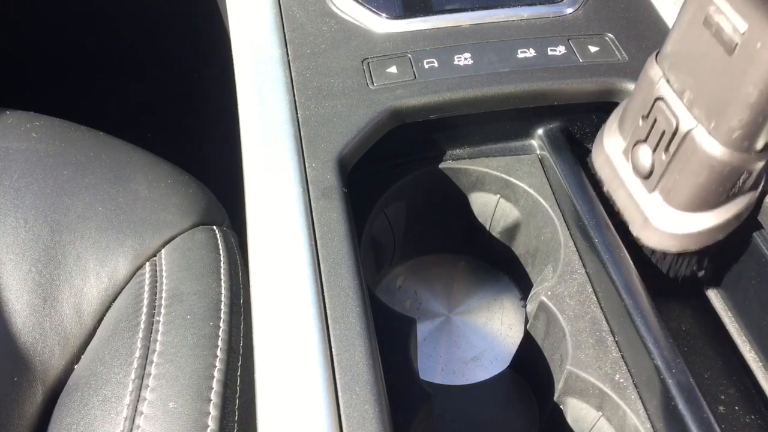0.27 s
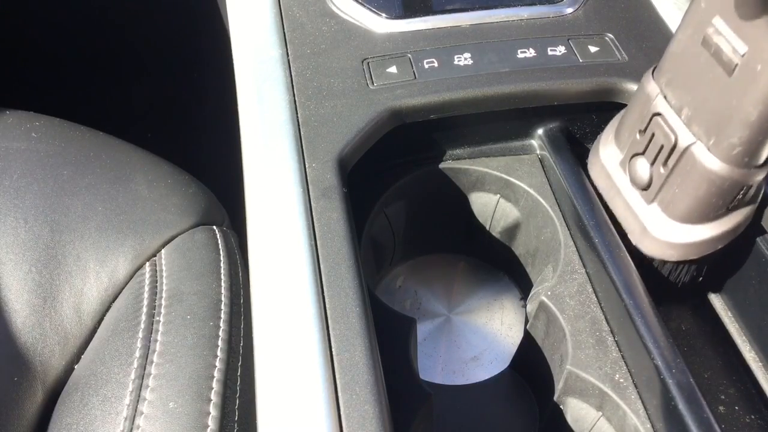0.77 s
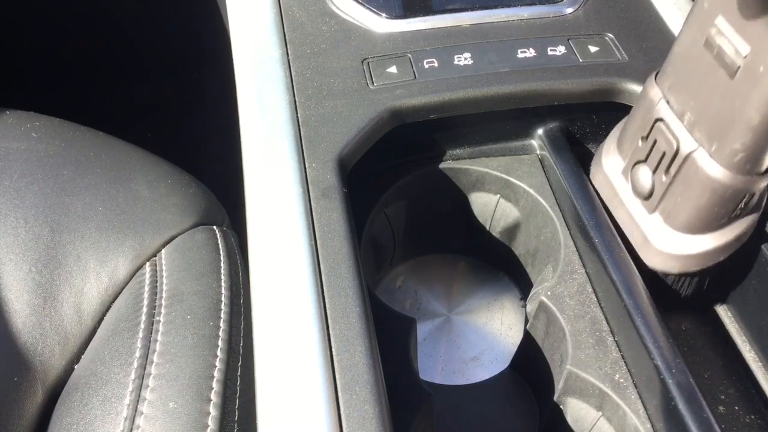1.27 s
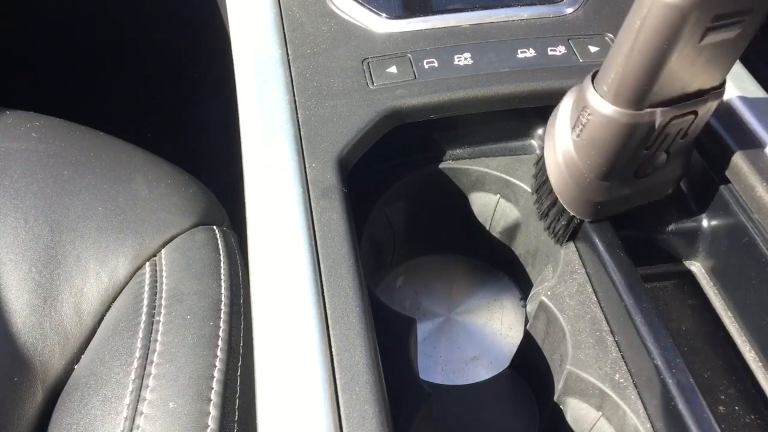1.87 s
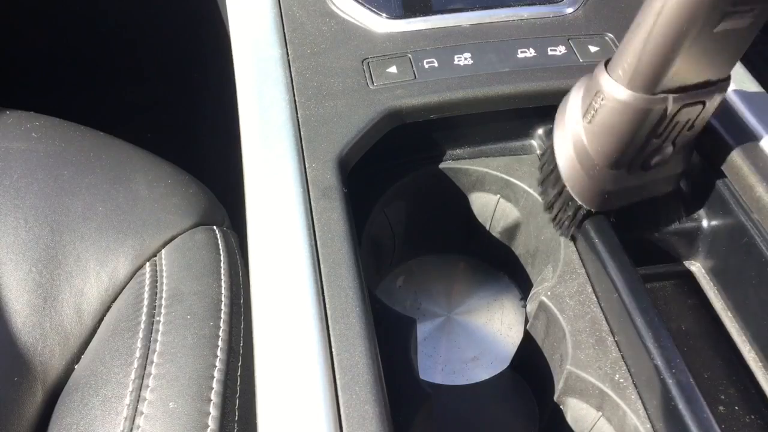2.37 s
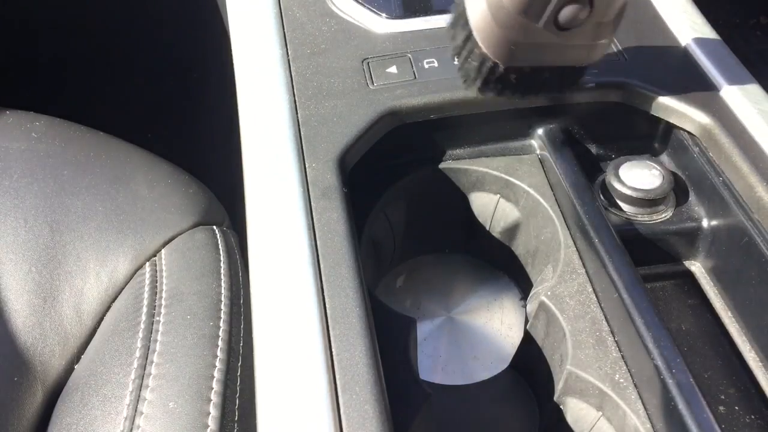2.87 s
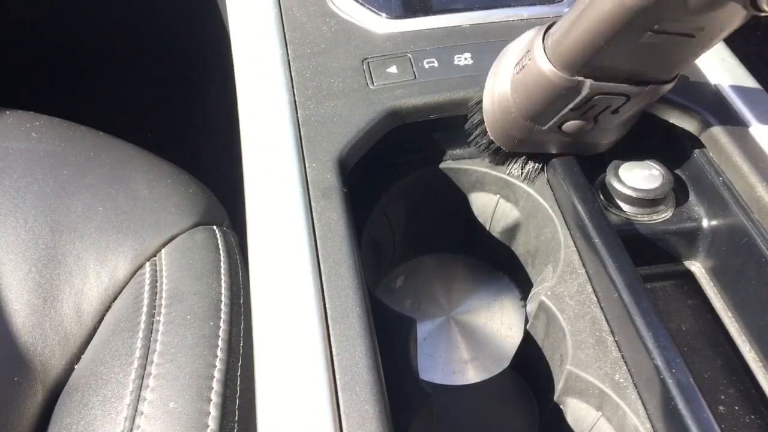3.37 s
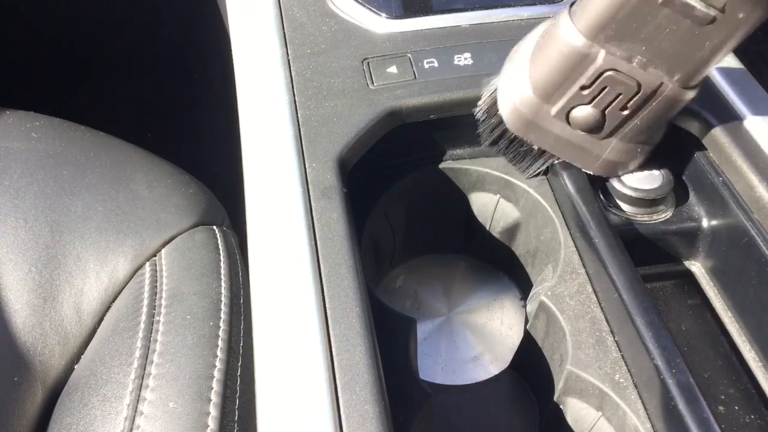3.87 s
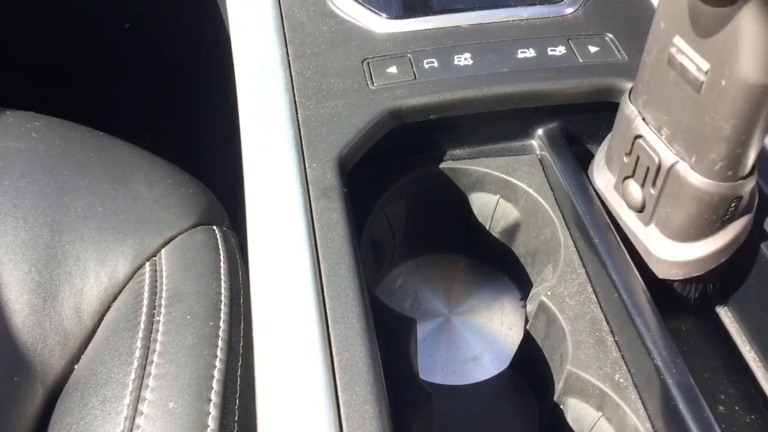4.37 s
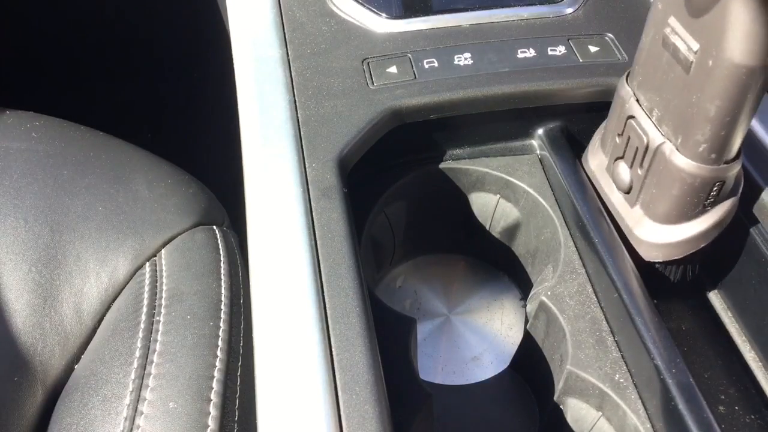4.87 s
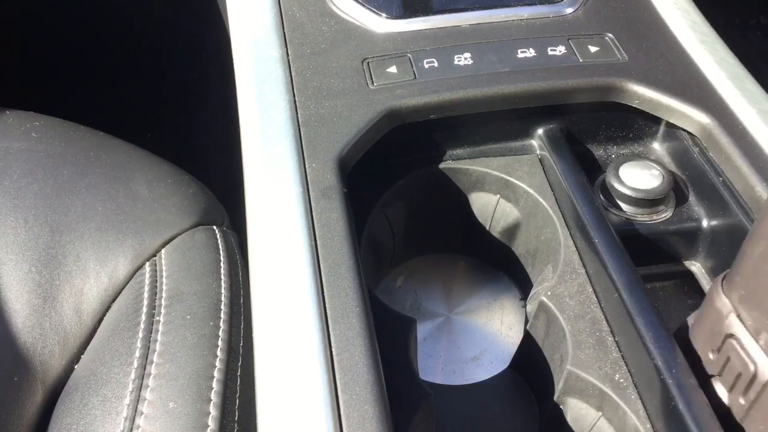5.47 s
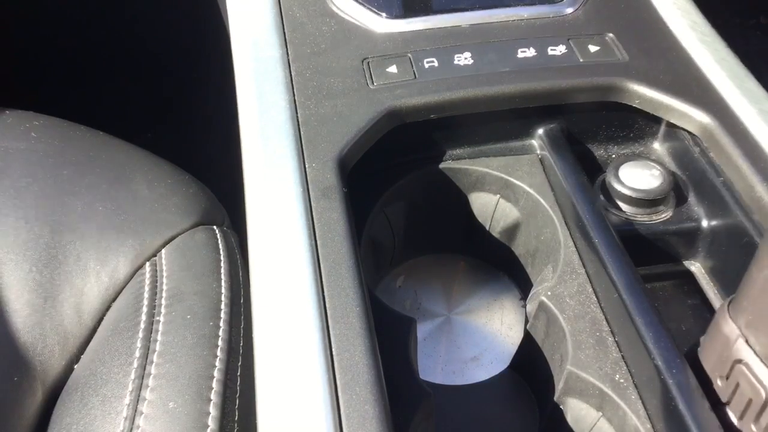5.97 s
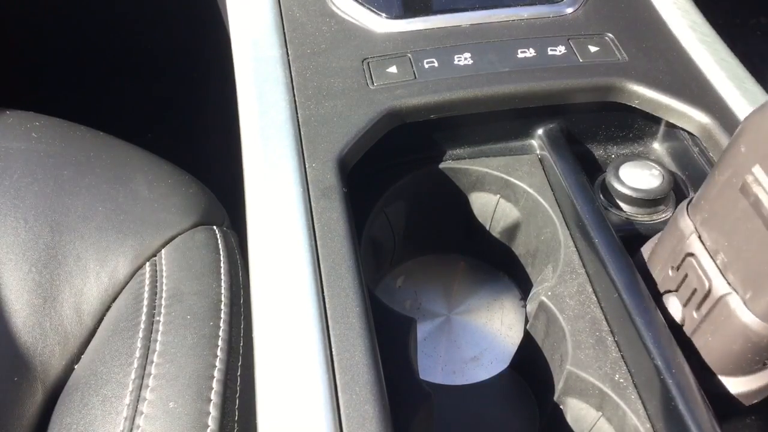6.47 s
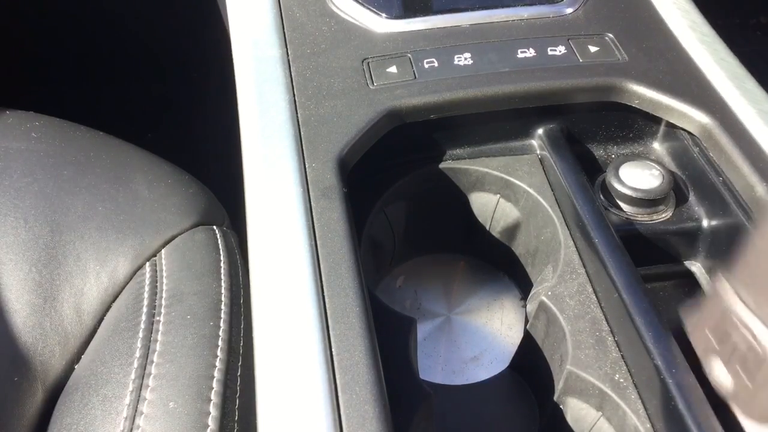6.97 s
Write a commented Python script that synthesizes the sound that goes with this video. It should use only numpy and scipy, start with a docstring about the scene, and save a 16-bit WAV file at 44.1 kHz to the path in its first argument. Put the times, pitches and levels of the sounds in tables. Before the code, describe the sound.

Close, bright vacuum hiss with a thin high motor whine, sparse soft bumps at first, then a flurry of dull thuds and hard plastic knocks.

```python
"""Handheld vacuum in a car

A cordless vacuum with a brush works over a plastic console inside a car, close to a mono microphone.
The impeller whines as sines on its shaft orders, above the roar and hiss of air made from shaped noise.
The brush rumbles over the trim; the nozzle bumps it, each bump a falling thump with a low heave under it.
Now and then the hard rim knocks and rings the plastic shell."""
import sys
import numpy as np
from scipy import signal
from scipy.fft import rfft, irfft, next_fast_len
from scipy.io import wavfile
from scipy.ndimage import uniform_filter1d, map_coordinates

SR = 44100
rng = np.random.default_rng(int(sys.argv[2]) if len(sys.argv) > 2 else 0)


def generate_wav(sig):
    """Save sig (samples, or channels by samples) to the path in sys.argv[1] as 16-bit PCM at SR."""
    pcm = np.round(np.clip(np.atleast_2d(sig).T, -1, 1) * 32767).astype(np.int16)
    wavfile.write(sys.argv[1], SR, pcm)


N = 318843  # samples, 7.23 s


def amp(db):
    """Amplitude factor for a level in dB."""
    return 10 ** (np.asarray(db) / 20)


def unit(x):
    """x scaled to rms 1."""
    return x / np.sqrt(np.mean(x ** 2) + 1e-20)


def curves(rows):
    """One value per sample for each column after the time."""
    seconds, *columns = np.transpose(rows)
    return [np.interp(np.arange(N) / SR, seconds, column) for column in columns]


def wobble(rate):
    """A smooth random curve with rate knots a second."""
    knots = rng.standard_normal(int(N * rate / SR) + 4)
    return map_coordinates(knots, [np.arange(N) * rate / SR])


def filtered(x, response):
    """x filtered by a response given as a function of frequency in Hz."""
    size = next_fast_len(N + SR // 2)
    spectrum = rfft(x, size) * response(np.fft.rfftfreq(size, 1 / SR))
    return irfft(spectrum, size)[..., :N]


def patches(shape, bins, frames):
    """Random values of rms 1 over frequency and time, smoothed across bins and frames."""
    field = uniform_filter1d(rng.standard_normal(shape), size=bins, axis=0)
    return unit(uniform_filter1d(field, size=frames, axis=1))


def rush(spectrum, patchy_db, flutter_db):
    """Turbulent noise of rms 1: patches of random gain and an unsteady flow."""
    z = signal.stft(rng.standard_normal(N), nperseg=512)[2]
    gain = amp(patchy_db * patches(z.shape, bins=5, frames=16))
    noise = signal.istft(z * gain, nperseg=512)[1][:N]
    corner_hz, db = np.transpose(spectrum)

    def colour(hz):
        return amp(np.interp(np.log(hz + 1), np.log(corner_hz), db, -120, -120))

    return unit(filtered(noise, colour) * amp(flutter_db * wobble(9)))


def ringing(x, peaks, floor_db):
    """x through fixed resonances whose powers add above a flat floor, rms 1."""
    def response(f):
        power = amp(2 * floor_db)
        for hz, width, db in peaks:
            power = power + amp(2 * db) / (1 + (2 * (f - hz) / width) ** 2)
        return np.sqrt(power)

    return unit(filtered(x, response))


# Shaft speed, sagging with the battery and rising when the nozzle is choked.
# Each row: time in seconds, speed in Hz.
SHAFT_SPEED = [(0, 1452), (.2, 1451.9), (.5, 1449.4), (1.8, 1447.8), (1.9, 1446.7), (2.9, 1445.4),
               (3.2, 1446.5), (3.42, 1450), (3.6, 1446.7), (3.85, 1447), (4, 1449.3), (4.15, 1448),
               (5.6, 1446.6), (5.83, 1448.6), (5.92, 1446.4), (6.3, 1446), (6.45, 1447.2), (6.6, 1445.6),
               (7.23, 1445)]
# Shaft tone at the microphone, steady but shadowed while the tool is turned away.
# Each row: time in seconds, level in dB.
SHAFT_LEVEL = [(0, -30.5), (1.76, -31), (1.88, -52), (2.2, -47), (2.42, -50), (2.52, -39), (2.78, -35.5),
               (3.06, -35), (3.21, -42), (3.38, -32.5), (3.54, -34), (3.62, -45), (3.8, -30.5), (3.9, -40),
               (4.0, -29.5), (4.9, -34), (5.4, -29.5), (6.3, -32.5), (6.87, -29), (7.23, -34.5)]
# Second shaft order. Each row: time in seconds, level in dB.
SECOND_LEVEL = [(0, -43), (1.6, -46), (1.8, -33.5), (1.9, -39.5), (2.35, -40), (2.9, -48.5), (3.2, -42),
                (3.55, -53), (4.25, -39), (4.55, -48), (5.0, -55), (5.25, -45), (5.8, -39.5), (7.23, -43)]
# Blade tone, fading in and out as the tool moves. Each row: time in seconds, level in dB.
BLADE_LEVEL = [(0, -33), (.17, -25), (.32, -40), (.5, -24), (.68, -46), (.82, -29), (.95, -38), (1.04, -34),
               (1.18, -25), (1.3, -42), (1.43, -29), (1.56, -34), (1.66, -44), (1.78, -32), (1.85, -39),
               (1.9, -24), (2.37, -36), (2.5, -29), (3.0, -25), (3.3, -27.5), (3.52, -24.5), (3.62, -39),
               (3.85, -36), (3.99, -29), (4.1, -36), (4.2, -32), (4.3, -36), (4.4, -29), (4.5, -41),
               (4.75, -40), (4.88, -33), (5.0, -40), (5.12, -31), (5.42, -28), (5.58, -37), (5.84, -29),
               (5.9, -37), (6.2, -38), (6.32, -26), (6.6, -29), (6.8, -48), (7.1, -29), (7.23, -31)]
BLADES = 7


def motor():
    """Shaft orders as sines; the casing hides or shows each as the hand turns it."""
    shaft_db, second_db, blade_db = (curves(rows)[0] for rows in (SHAFT_LEVEL, SECOND_LEVEL, BLADE_LEVEL))
    speed_hz = curves(SHAFT_SPEED)[0] + .25 * wobble(20)
    turn = 2 * np.pi * np.cumsum(speed_hz) / SR
    # each level trembles both fast and slowly
    shaft = amp(shaft_db + .78 * wobble(25) + 1.0 * wobble(8)) * np.sin(turn)
    second = amp(second_db + 2.4 * wobble(25) + 1.45 * wobble(8)) * np.sin(2 * turn)
    blade = amp(blade_db + 1.7 * wobble(30) + 1.3 * wobble(9)) * np.sin(BLADES * turn)
    # weak orders on either side of the blade tone come and go
    side = sum(amp(db + 3.3 * wobble(6.1)) * np.sin(order * turn) for order, db in ((5, -46), (8, -48)))
    return np.sqrt(2) * (shaft + second + blade + side)  # the levels are rms


# Air spectra by place: roar in the wand, hum in the casing, rush at the nozzle, hiss at the bristles,
# hiss at the exhaust and fizz at the vents. Each row: frequency in Hz, relative density in dB per Hz.
ROAR_SPECTRUM = [(150, -37), (300, -8), (500, -1.5), (1300, 0.5), (1600, 1), (2500, -40)]
HUM_SPECTRUM = [(800, -44), (1400, 1), (1700, -2.5), (3500, -2), (4300, -11.5), (6000, -38)]
NOZZLE_SPECTRUM = [(2800, -25), (3800, -6), (4300, -5), (4900, -1.5), (5400, -2), (5900, -5.5), (7500, -28)]
BRISTLE_SPECTRUM = [(4500, -48), (5600, -3), (6100, -1), (6800, 2), (7600, -2.5), (8400, -5.5),
                    (11000, -40)]
EXHAUST_SPECTRUM = [(6500, -47), (7800, -7.5), (8300, -2), (8700, -3), (9300, -1), (9800, -4.5),
                    (10500, -8.5), (11500, -42)]
VENT_SPECTRUM = [(9000, -14), (10300, -6.5), (11000, -5), (11600, -3.5), (12500, -1), (13500, -5),
                 (14500, -4.5), (16000, -4.5)]
# Resonances of the wand's air column, then of the casing.
# Each row: frequency in Hz, width in Hz, relative level in dB.
WAND_MODES = [(750, 89, -1.5), (1061, 96, -5.5), (1212, 78, 1)]
CASING_MODES = [(1830, 200, -5), (2080, 90, -3.5), (2376, 91, -0.5), (3160, 530, -6)]
# Hiss as the tool turns to and from the microphone and the brush meets or leaves the trim.
# Each row: time in seconds, exhaust level in dB, bristle level in dB.
HISS_LEVELS = [(0, -22, -28), (.34, -22, -27), (1.63, -22, -26.5), (1.83, -24, -29.5), (1.92, -25, -30),
               (2.13, -26.5, -32), (2.6, -26.5, -32.5), (3.15, -24.5, -30.5), (3.4, -21.5, -30),
               (3.52, -23.5, -31), (3.59, -26.5, -32), (3.83, -25.5, -33), (3.89, -26.5, -32),
               (4.07, -20, -30), (4.15, -23.5, -30), (4.33, -21.5, -26.5), (5.17, -21, -27),
               (5.5, -22, -25.5), (6.12, -22, -25.5), (6.45, -23, -27), (6.55, -21.5, -25),
               (6.75, -22.5, -25.5), (6.93, -21, -25), (7.23, -22, -28.5)]
# Air in the wand and at the nozzle. Each row: time in seconds, roar level in dB, rush level in dB.
FLOW_LEVELS = [(0, -30, -30.5), (.34, -33.5, -30.5), (1.33, -31, -30), (1.7, -32.5, -31.5), (1.9, -32, -29),
               (2.45, -29, -29.5), (2.85, -34.5, -30.5), (3.35, -33.5, -29), (3.83, -30.5, -29),
               (4.15, -33, -30), (5.3, -32, -30), (5.74, -30.5, -29.5), (5.98, -33, -29.5),
               (6.3, -30.5, -29.5), (6.93, -32.5, -28.5), (7.23, -30.5, -30)]
# casing hum and vent fizz: base level in dB, and dB gained per dB of exhaust hiss above its mean
CASING_DB, CASING_FOLLOWS = -30.5, .21
VENT_DB, VENT_FOLLOWS = -22, .55
DRIFT_DB, DRIFT_PER_S = .5, 7.5  # casing and vents also wander by themselves


def air():
    """Flow noise rings the wand and casing, rushes past nozzle and bristles and leaves by the exhaust."""
    exhaust_db, bristle_db = curves(HISS_LEVELS)
    roar_db, nozzle_db = curves(FLOW_LEVELS)

    def following(db, follows):
        return db + follows * (exhaust_db - exhaust_db.mean()) + DRIFT_DB * wobble(DRIFT_PER_S)

    roar = ringing(rush(ROAR_SPECTRUM, patchy_db=.4, flutter_db=.3), WAND_MODES, floor_db=-13)
    roar = amp(roar_db + 1.3 * wobble(22)) * roar  # the flow in the wand flutters quickly
    hum = ringing(rush(HUM_SPECTRUM, patchy_db=.6, flutter_db=.5), CASING_MODES, floor_db=-9)
    hum = amp(following(CASING_DB, CASING_FOLLOWS)) * hum
    hisses = [(nozzle_db, NOZZLE_SPECTRUM), (bristle_db, BRISTLE_SPECTRUM), (exhaust_db, EXHAUST_SPECTRUM),
              (following(VENT_DB, VENT_FOLLOWS), VENT_SPECTRUM)]
    hiss = sum(amp(db) * rush(spectrum, patchy_db=.6, flutter_db=.6) for db, spectrum in hisses)
    return roar + hum + hiss


def cabin(x, depth_db):
    """Echoes off glass and dash, as narrow ridges of random gain that drift as the tool moves."""
    z = signal.stft(x, nperseg=1024)[2]
    gain = unit(amp(depth_db * patches(z.shape, bins=2, frames=24)))
    return signal.istft(z * gain, nperseg=1024)[1][:N]


# Cabin rumble under the brush. Each row: time in seconds, level in dB.
RUMBLE_LEVEL = [(0, -42.5), (1.11, -41.5), (2.41, -39), (2.84, -41.5), (3.38, -37.5), (4.3, -39),
                (5.15, -40.5), (5.8, -33), (6.2, -37.5), (6.78, -36.5), (6.91, -40), (7.23, -34.5)]
# Its colour. Each row: frequency in Hz, relative density in dB per Hz.
RUMBLE_SPECTRUM = [(15, -45), (30, -0.5), (65, -2), (130, -5), (200, -4), (300, -2), (480, -10.5),
                   (900, -10)]


def rumble():
    """The brush drags over the trim and shakes it in lumps."""
    return amp(curves(RUMBLE_LEVEL)[0]) * rush(RUMBLE_SPECTRUM, patchy_db=2.0, flutter_db=1.5)


# Nozzle bumps on the trim. Each row: start in seconds, level in dB,
# direction (+1 push, -1 release), weight behind it (0 to 1.5).
NOZZLE_BUMPS = [(0.165, -19.5, 1, 0.97), (0.226, -3, 1, 0.1), (0.247, -11.5, -1, 0.4),
                (0.5777, -19, 1, 1.5), (0.7892, -19, 1, 0.7), (0.8286, -21, 1, 0.7),
                (0.8722, -21.5, 1, 0.8), (1.033, -19, -1, 0.77), (1.0553, -22, 1, 0.6),
                (3.187, -22.5, -1, 1.2), (3.382, -19, 1, 0.9), (3.463, -20.5, 1, 0.76),
                (4.337, -21, 1, 0.0), (4.3494, -14, 1, 0.36), (4.4068, -15, 1, 0.5), (4.4196, -4, 1, 0.5),
                (5.055, -14, 1, 1.03), (5.067, -3, 1, 0.4), (5.1115, -19, -1, 0.72), (5.3148, -21, 1, 1.23),
                (5.4915, -18, 1, 0.79), (5.509, -19, -1, 1.5), (5.6959, -9.5, 1, 1.32),
                (5.734, -9, 1, 0.62), (5.749, -2, 1, 0.6), (5.7656, -9, 1, 1.5), (5.7773, -16, 1, 1.5),
                (5.817, -6, 1, 0.93), (5.846, 0.5, 1, 0.7), (5.9204, -7, 1, 1.11), (5.9689, -3.5, 1, 1.5),
                (6.002, -19, 1, 0.7), (6.028, -18, 1, 0.91), (6.0883, -12, 1, 1.0), (6.1016, -10, 1, 0.63),
                (6.1194, -1.5, 1, 0.4), (6.1734, -15, 1, 0.41), (6.1765, -14, 1, 0.87),
                (6.2109, -4, 1, 0.12), (6.2148, -4.5, 1, 0.95), (6.2464, -8, 1, 0.5), (6.3307, -9, 1, 0.63),
                (6.434, -14.5, 1, 0.86), (6.4392, -18, 1, 0.9), (6.5505, -16, 1, 0.8),
                (6.5985, -12.5, 1, 0.6), (6.614, -14, -1, 0.0), (6.6537, -19, 1, 0.75),
                (6.7235, -9.5, 1, 0.2), (6.8476, -14, 1, 0.5), (6.944, -21, 1, 1.5), (7.117, -19, 1, 1.46),
                (7.141, -16, 1, 0.0), (7.153, -2, 1, 0.6), (7.165, -18, 1, 0.3), (7.1871, -17, 1, 0.16)]


def bumps():
    """Each bump is a short thump falling in pitch, with one brief low heave under it."""
    t = np.arange(SR // 16) / SR
    spread = 1 + t / .002
    sweep = -np.sin(np.pi * np.log(spread) / .635) * np.exp(-t / .027) / spread ** .85
    heave = np.sin(2 * np.pi * 52 * t) * np.exp(-t / .006) * (1 - np.exp(-t / .005))
    # a fainter, quickly fading edge leads by about a millisecond
    edge = -amp(-18 - 60 * t / .013) * np.sin(2 * np.pi * 690 * t)
    lead = SR // 850  # samples
    out = np.zeros(N + SR)
    for seconds, db, direction, weight in NOZZLE_BUMPS + jolts():
        start = round(seconds * SR)
        push = direction * amp(db)
        out[start:][:len(t)] += push * (sweep + weight * heave)
        out[start - lead:][:len(t)] += push * edge
    return out[:N]


SCRUB_START_S, SCRUB_END_S, JOLTS = 5.25, 7.2, 30
JOLT_DB, JOLT_SPREAD_DB = -25.5, 5.6  # centre, and the most above or below it


def jolts():
    """Faint bumps at random while the brush scrubs, as rows like those of the nozzle bumps."""
    rows = []
    for when, loud, heavy in rng.random((JOLTS, 3)):
        seconds = SCRUB_START_S + (SCRUB_END_S - SCRUB_START_S) * when
        rows.append((seconds, JOLT_DB + JOLT_SPREAD_DB * (2 * loud - 1), 1, .88 * heavy))
    return rows


# Knocks of the hard rim. Each row: start in seconds, level in dB,
# treble tilt of the ring in dB per octave, crack level in dB relative to the knock.
RIM_KNOCKS = [(4.3365, -14, 2, -4), (5.314, -26, 12, 0), (5.9305, -20, 7, 0), (6.2778, -10, -2, -12),
              (6.755, -30, 10, 4), (7.1515, -2.5, 3, -14), (7.158, -13, 1, -6)]
# Modes of the plastic shell. Each row: frequency in Hz, level in dB, time to fall 60 dB in seconds.
SHELL_MODES = [(300, -14, .05), (520, -12, .04), (720, 0, .04), (860, -10, .03), (1080, -14, .025),
               (1300, -11, .03), (1600, -8, .02), (2000, -8, .02), (2300, -13, .014)]


def knocks():
    """Knocks ring the shell under a short crack, each with its own treble tilt; the faintest ring brightest."""
    t = np.arange(SR // 10) / SR
    out = np.zeros(N + SR)
    band = signal.butter(4, [300, 2300], "band", fs=SR, output="sos")
    onset = 1 - np.exp(-t / .00047)
    for seconds, db, treble_db, crack_db in RIM_KNOCKS:
        ring = np.zeros(len(t))
        for hz, mode_db, t60 in SHELL_MODES:
            strike_db = mode_db + treble_db * np.log2(hz / 720) + rng.normal(0, 1.5)
            ring += amp(strike_db - 60 * t / t60) * np.sin(2 * np.pi * hz * t)
        noise = unit(signal.sosfilt(band, rng.standard_normal(len(t))))
        crack = amp(crack_db - 60 * t / .081) * noise
        out[round(seconds * SR):][:len(t)] += amp(db) * (ring + crack) * onset
    return out[:N]


def scene():
    """All sources at one microphone, the same in both channels; the cabin combs only the air."""
    mono = motor() + cabin(air(), depth_db=2.1) + rumble() + bumps() + knocks()
    return np.array([mono, mono])


TOP_HZ = 15370  # band limit


def record(dry):
    """The microphone cuts deep bass steeply, its input saturates softly and its band ends at a limit."""
    def bass_cut(hz):
        u = 1j * hz / 45
        return (u * u / (1 + 1.2 * u + u * u)) ** 2

    heard = filtered(dry, bass_cut)
    heard = heard / (1 + np.abs(heard / .97) ** 8) ** (1 / 8)
    # the treble falls to nothing over the last 80 Hz
    return filtered(heard, lambda hz: np.clip((TOP_HZ - hz) / 80, 0, 1) ** 3)


dry = scene()
out = record(dry)
generate_wav(out)
```